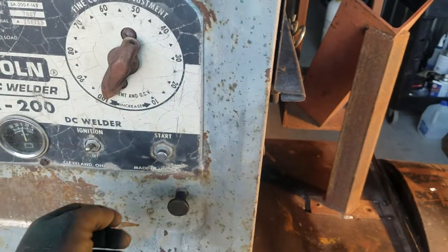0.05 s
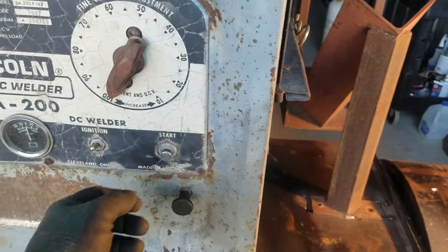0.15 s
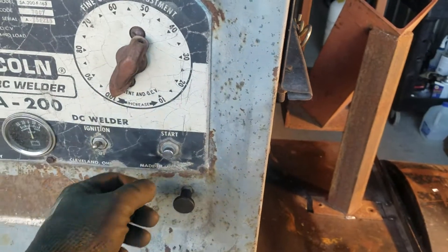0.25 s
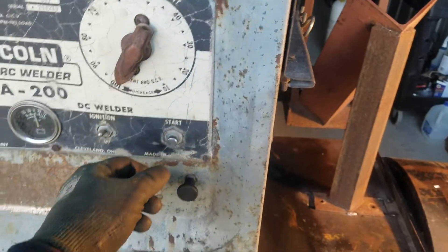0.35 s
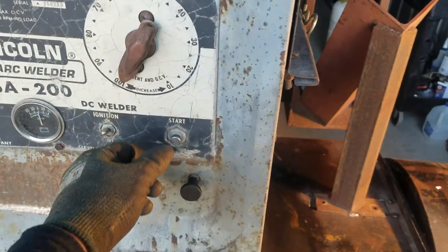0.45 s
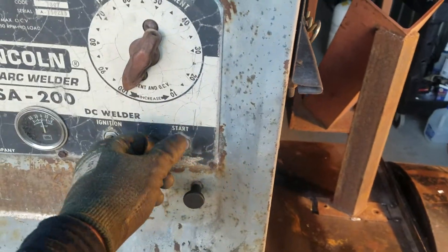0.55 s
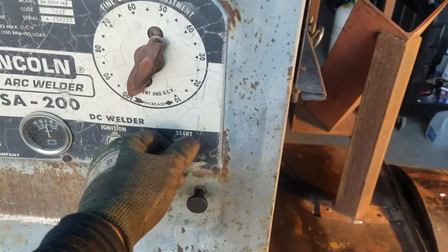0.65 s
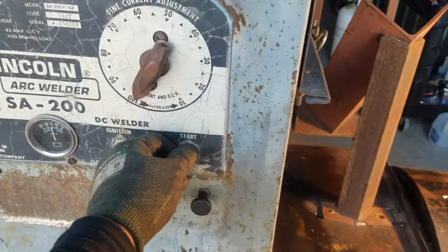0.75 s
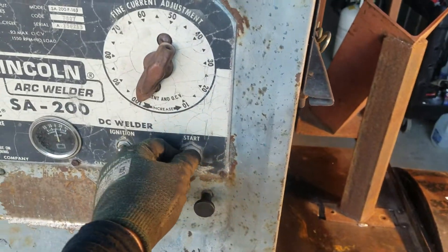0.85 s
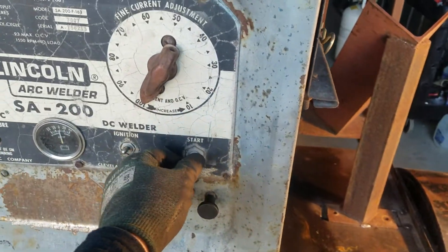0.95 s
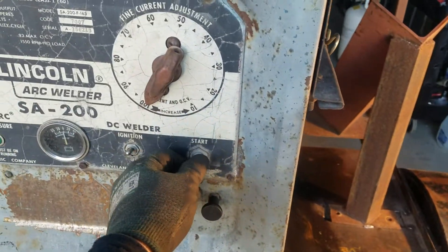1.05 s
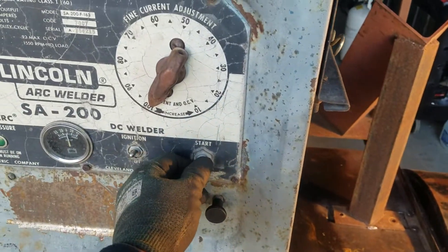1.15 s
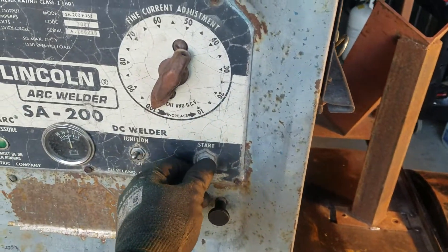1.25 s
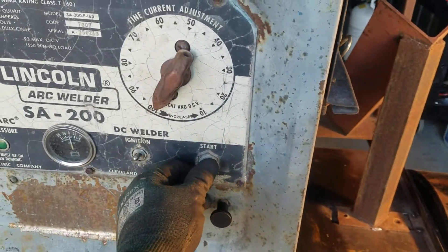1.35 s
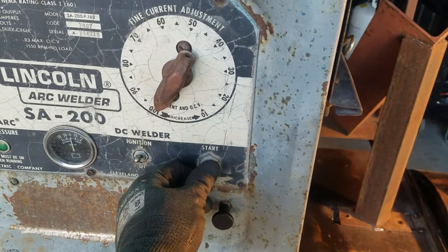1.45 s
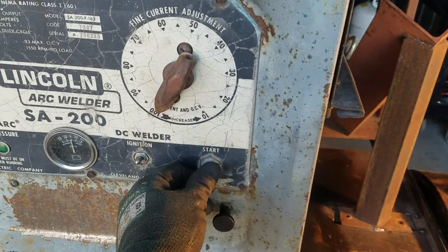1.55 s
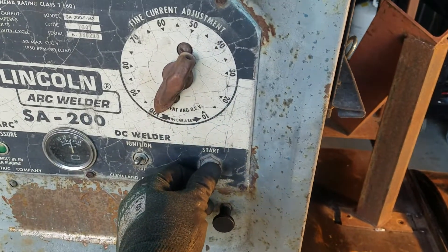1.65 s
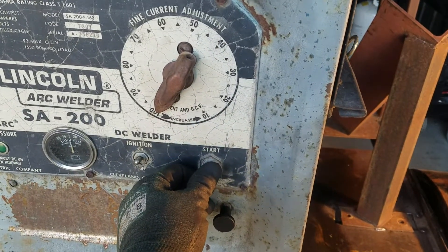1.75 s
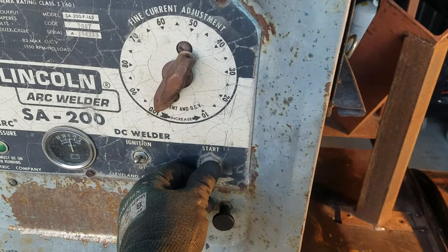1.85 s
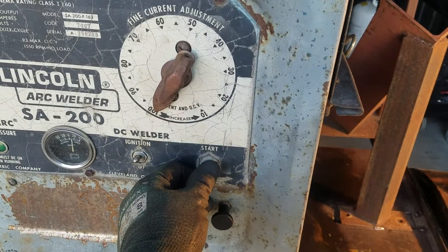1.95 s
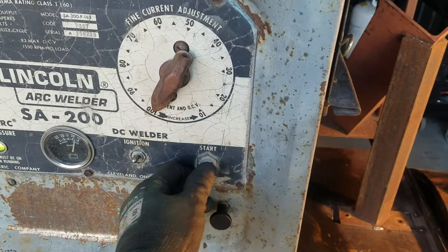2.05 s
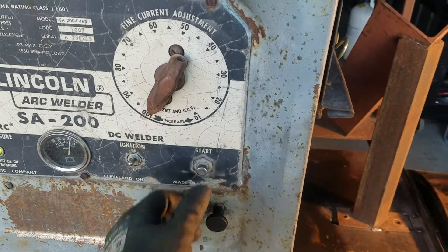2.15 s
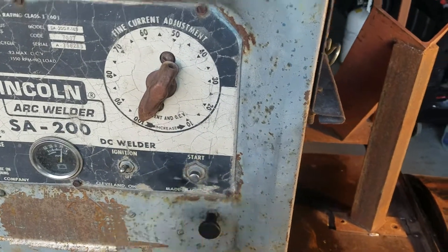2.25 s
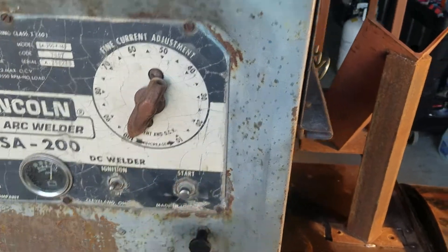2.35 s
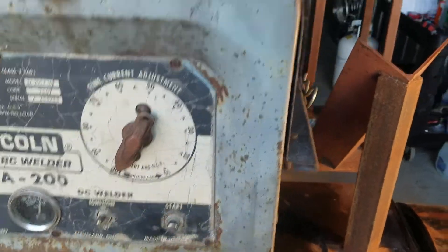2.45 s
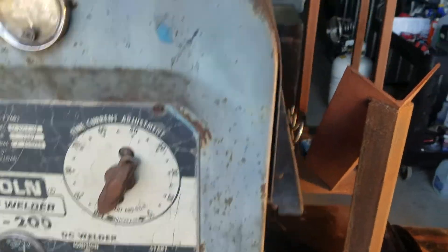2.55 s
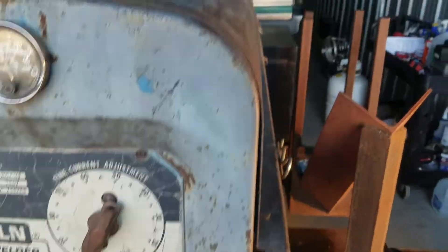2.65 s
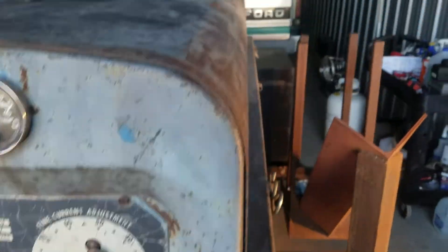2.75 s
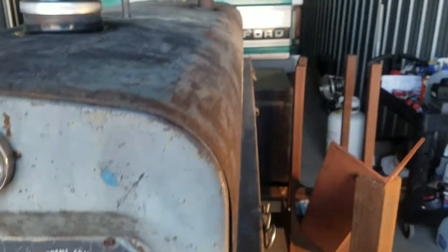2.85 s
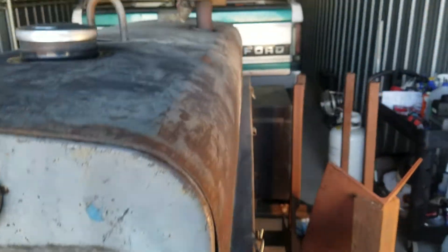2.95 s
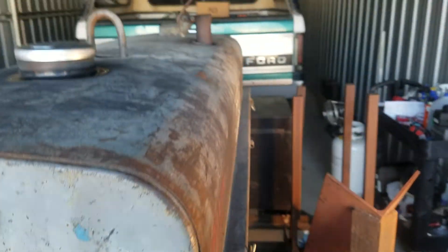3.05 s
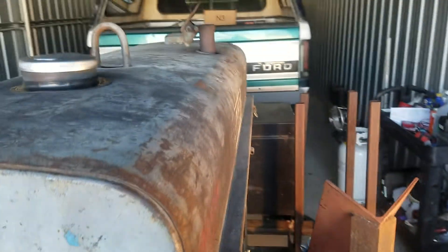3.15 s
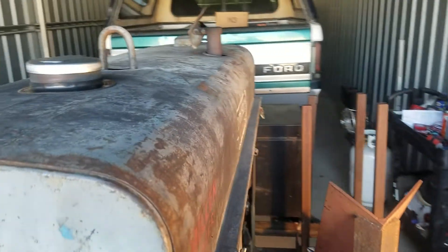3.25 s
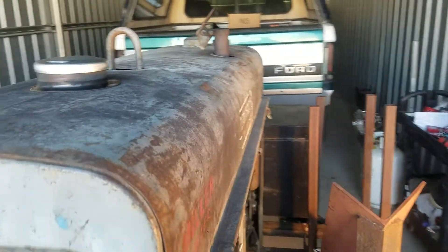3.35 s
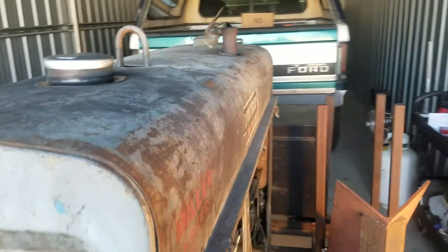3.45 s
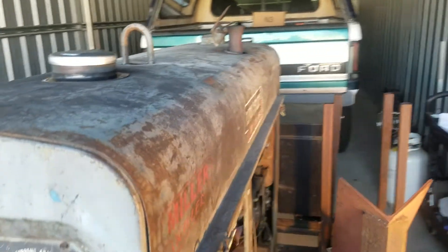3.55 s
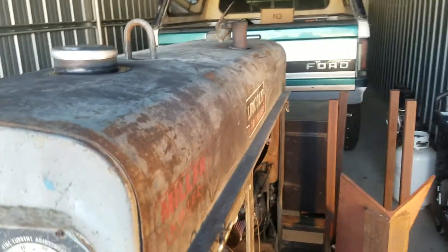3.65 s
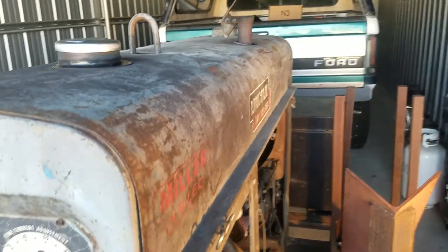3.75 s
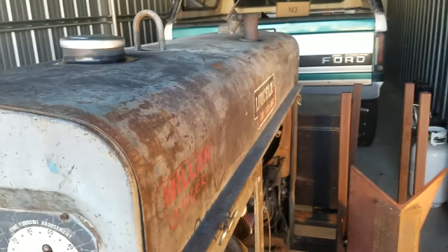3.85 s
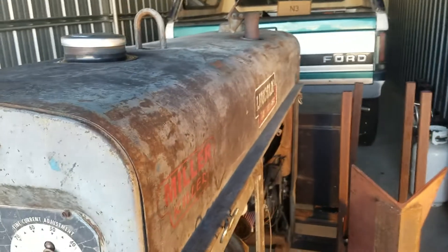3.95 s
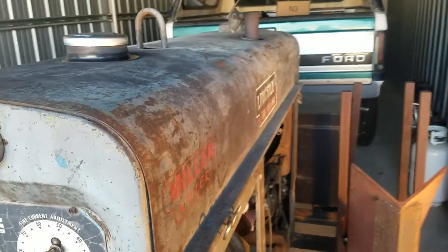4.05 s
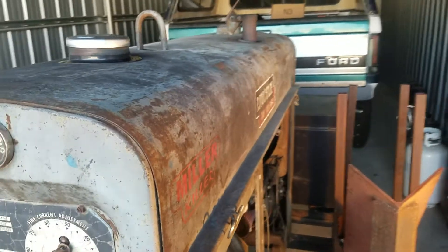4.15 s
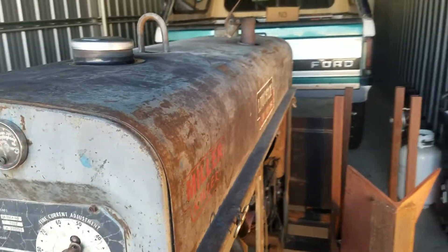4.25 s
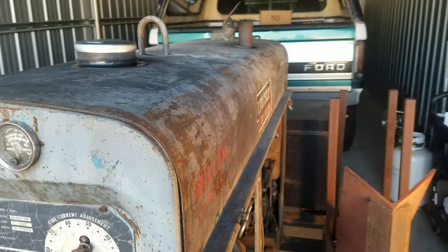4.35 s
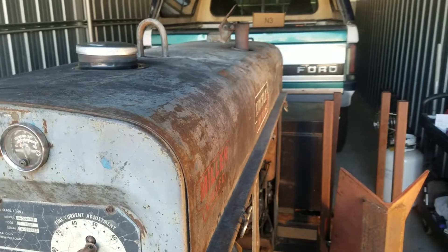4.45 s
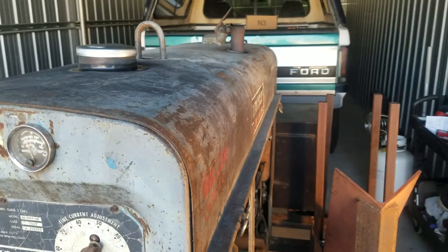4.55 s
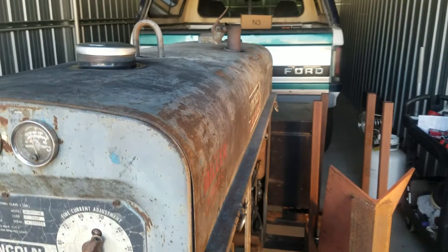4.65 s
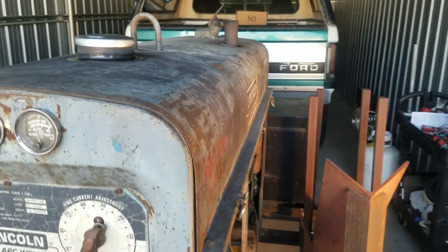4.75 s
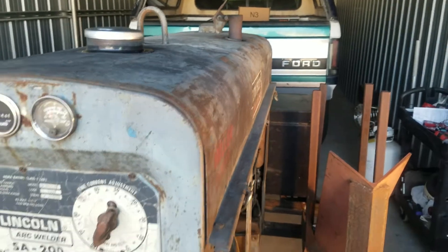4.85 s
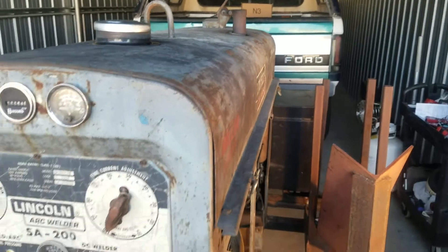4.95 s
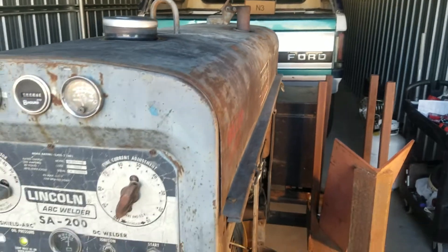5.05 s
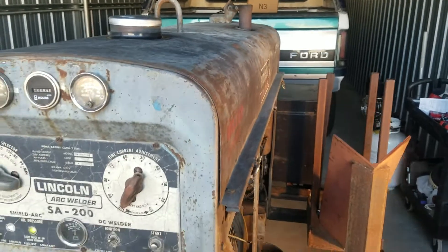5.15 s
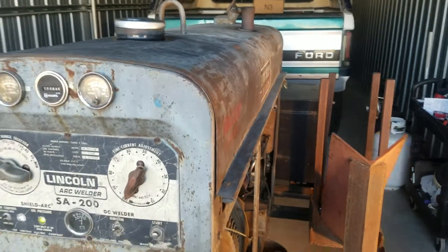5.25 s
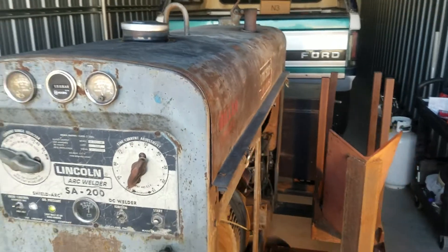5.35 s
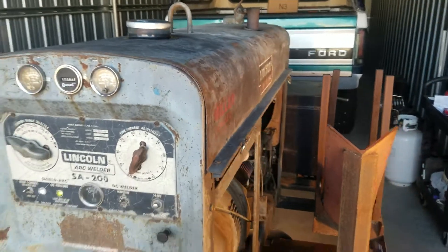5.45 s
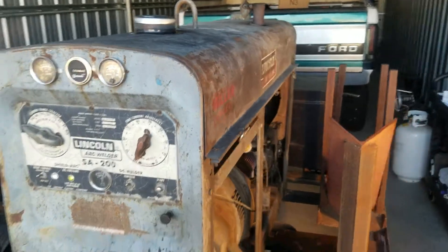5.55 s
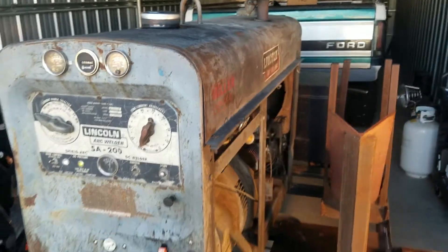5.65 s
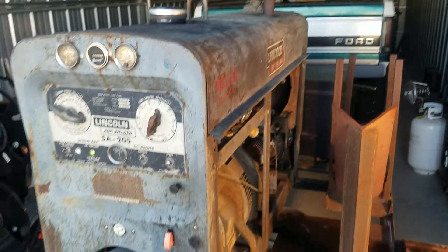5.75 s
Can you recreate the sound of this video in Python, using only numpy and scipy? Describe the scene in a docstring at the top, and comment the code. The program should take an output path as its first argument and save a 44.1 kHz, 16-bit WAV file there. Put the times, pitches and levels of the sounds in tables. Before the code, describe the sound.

In a quiet sheet-metal workshop, a glove and sleeve rustle close to the microphone, with small clicks and a dull thump on a control panel at about 0.8 seconds. A button clicks at 1.3 seconds, and the starter immediately slams in with a ringing clank, grinding and squealing over a low groan through a few surges. The welder's gasoline engine catches just before 2 seconds and the starter drops out shortly after. Hard knocks and exhaust puffs come faster and faster, ringing the steel hood, until about 2.8 seconds. The speed dips slightly and settles into an even drone by 3.3 seconds, while the loose hood taps irregularly. From about 3.5 seconds the rumble, clatter, valve ticking and fan hiss grow as the microphone moves to the engine's open side. It runs steadily, with a light panel buzz, until the end near 5.8 seconds.

```python
"""A four-cylinder gasoline welder starts up close by in a sheet-metal workshop.
A gloved hand rustles and works the switch and start button. The starter's small gear slams into the
engine's ring gear and grinds. The engine catches and races up with hard knocks that ring its hood.
The governor (speed control) closes the throttle, exhaust puffs merge into an even drone, and the
engine's rumble, clatter and fan hiss grow as the microphone moves round to its open side."""
import sys
import numpy as np
from scipy import signal
from scipy.fft import rfft, irfft, next_fast_len
from scipy.io import wavfile

SR = 44100
rng = np.random.default_rng(int(sys.argv[2]) if len(sys.argv) > 2 else 0)


def wrap_up_sound(samples):
    """Save the sound to the file named by the first command line argument, as 16-bit audio."""
    columns = np.atleast_2d(samples).T
    # keep every value between -1 and 1, then stretch to whole-number steps
    tamed = np.clip(columns, -1, 1)
    steps = np.round(tamed * 32767).astype(np.int16)
    wavfile.write(sys.argv[1], SR, steps)


N = 256220
TIME = np.arange(N) / SR
SIZE = next_fast_len(N + SR // 2, real=True) // 2 * 2
FREQ = np.maximum(np.arange(SIZE // 2 + 1) * SR / SIZE, 1)
MESH_S, CATCH_S, RELEASE_S = 1.355, 1.9562, 2.214  # starter engages, engine fires, starter lets go

# tones at which the steel hood rings: f/Hz, width/Hz, boost/dB
HOOD = [(1020, 37, 5), (1604, 18, 3), (1755, 16, 7.5), (1942, 42, 6), (2094, 73, 2.5), (2402, 24, 4),
        (2730, 44, 1), (2797, 54, 3.5), (3090, 16.6, 5), (3340, 40, -1.5)]
# pistons squeeze before the engine fires: t/s, knock/dB, f/Hz, relative snap/dB, gear surge/dB
COMPRESSIONS = [(1.584, -15, 1333, -16, -3.5), (1.688, -14.5, 1524, -15, 0), (1.7945, -14, 1486, -6, -6.5),
                (1.866, -31, 2392, -13, 1.5)]
# the microphone moves from behind the control panel to the engine's open side: t/s, exposure/0-1
EXPOSURE = [(3.4, 0.3), (3.85, 0.52), (4.3, 0.92), (5.0, 1), (5.8, 1)]


def undb(db):
    """Turn decibels into a gain."""
    return np.exp(np.asarray(db) * np.log(10) / 20)


def curves(table):
    """Each column of a table of timed rows, joined by straight lines."""
    times, *columns = np.transpose(table)
    return [np.interp(TIME, times, column) for column in columns]


def slope(points):
    """Gain at every frequency, from points of f/Hz, level/dB."""
    hz, db = np.transpose(points)
    return undb(np.interp(np.log(FREQ), np.log(hz), db))


def noise():
    """Two white noises: mid (what left and right share) and side (how they differ)."""
    return rng.standard_normal((2, N))


def walk(rate):
    """A random wobble of size about 1, with `rate` new values a second."""
    knots = rng.standard_normal(8192)
    return np.interp(TIME * rate, np.arange(len(knots)), knots)


def swell(s, peak_s):
    """A push that starts at time s, reaches 1 after peak_s and dies away."""
    age = np.clip((TIME - s) / peak_s, 0, 20)
    return age * np.exp(1 - age)


def body(x, points, modes=()):
    """Give x a tone colour (f/Hz, relative level/dB) and resonances (f/Hz, width/Hz, boost/dB)."""
    power = slope(points) ** 2
    for hz, width, db in modes:
        power *= 1 + (undb(db) ** 2 - 1) / (1 + ((FREQ - hz) * (2 / width)) ** 2)
    power /= np.mean(power)
    # folding the cepstrum makes the ringing come after a hit, never before it
    cepstrum = irfft(np.log(power + 1e-18).astype(np.float32) / 2)
    cepstrum[1:SIZE // 2] *= 2
    cepstrum[SIZE // 2 + 1:] = 0
    return irfft(rfft(x.astype(np.float32), SIZE) * np.exp(rfft(cepstrum)))[..., :N]


def cabinet(x, echo_db, fade_s):
    """Add the quick echoes that bounce between the steel panels."""
    t = TIME[:2048]
    echoes = rng.standard_normal((2, len(t))) * np.exp(-t / fade_s) * (t > .001)
    echoes *= undb(echo_db) / np.sqrt(np.sum(echoes ** 2, axis=1, keepdims=True))
    return (x + signal.oaconvolve(x, echoes, axes=1)[:, :N]) / np.sqrt(1 + undb(echo_db) ** 2)


def blows(times, db, fade_s, tail_db, tail_s):
    """Loudness of blows over time: each fades fast, then lingers in the metal and the shop."""
    hits = np.full(N, 1e-18)
    np.add.at(hits, np.clip((np.asarray(times) * SR).astype(int), 0, N - 1), undb(db) ** 2)
    direct, tail = (signal.lfilter([1], [1, -np.exp(-2 / (s * SR))], hits) for s in (fade_s, tail_s))
    return np.sqrt(direct + undb(tail_db) ** 2 * tail)


def strike(hits):
    """Struck metal rings: each hit is a time and its tones (f/Hz, level/dB, time to fade 60 dB/s)."""
    out = np.zeros((2, N))
    for s, modes in hits:
        start = int(s * SR)
        t = TIME[:min(int(SR * max(mode[2] for mode in modes)), N - start)]
        attack = np.minimum(t / .001, 1)
        for hz, db, t60 in modes:
            tone = np.sin(2 * np.pi * (hz * t + rng.random((2, 1))))
            out[:, start:start + len(t)] += undb(db - 60 * t / t60) * tone * attack
    return out


def clang(times, hz, width_hz):
    """A blurred panel tone whose pitch jumps with each blow, as each lands on another spot."""
    order = np.argsort(times)
    latest = np.maximum(np.searchsorted(times[order], TIME, side="right") - 1, 0)
    phase = 2 * np.pi * np.cumsum(hz[order][latest]) / SR
    return np.array([np.sqrt(2) * np.sin(phase + 1.1 * walk(width_hz)) for _ in range(2)])


def rubbed_steel(table, wander, rough_db, rate):
    """Short, rough, unsteady tones of steel rubbing on steel."""
    drift, rough = wander * walk(rate), undb(rough_db * walk(rate))
    return rough * sum(undb(db) * swell(s, peak_s) * np.sin(2 * np.pi * (hz * TIME + drift))
                       for s, peak_s, hz, db in table)


def speed():
    """Firings per second: they rise evenly until the governor holds them."""
    # the speed overshoots, swings and settles: t/s, firing rate/Hz
    governed = [(2.75, 55.3), (3.0, 51.8), (3.17, 47.8), (3.33, 51.4), (3.48, 53), (3.78, 50.1),
                (4.0, 51.1), (4.3, 52.2), (4.6, 51.3), (4.85, 50.8), (5.2, 51.7), (5.8, 51.1)]
    first_hz, rise_hz_per_s = 14.74, 52.04
    run_up = first_hz + rise_hz_per_s * (TIME - CATCH_S)
    return np.minimum(run_up, curves(governed)[0]) * (TIME > CATCH_S)


def crank():
    """Count piston strokes since the first firing; those before it count as negative."""
    times = [row[0] for row in COMPRESSIONS] + [CATCH_S]
    return np.interp(TIME, times, np.arange(-len(COMPRESSIONS), 1)) + np.cumsum(speed()) / SR


def each_cycle(firings, count):
    """A random pattern of `count` points that repeats once all four cylinders have fired."""
    patterns = rng.standard_normal((2, count))
    position = firings / 4 * count
    return np.array([np.interp(position, np.arange(count), p, period=count) for p in patterns])


def shake(firings, repeat):
    """Vibration: the share `repeat` comes back every engine cycle, the rest is random."""
    return np.sqrt(repeat * 1.5) * each_cycle(firings, count=3400) + np.sqrt(1 - repeat) * noise()


def crank_tones(firings, orders, waver_db):
    """Wavering tones at multiples of the firing rate."""
    return np.sqrt(2) * sum(
        undb(db + waver_db * walk(9)) * np.cos(2 * np.pi * (order * firings + rng.random()))
        for order, db in orders)


def engine_db(base_db, throttle_db, exposed_db):
    """Level of an engine noise: it follows the throttle and grows on the engine's open side."""
    # the governor shuts the throttle, then eases it open to hold the speed: t/s, opening/0-1
    throttle = [(2.68, 0.68), (2.79, 0.4), (2.95, 0.3), (3.04, 0), (3.22, 0.27), (3.45, 0.05)]
    return base_db + throttle_db * curves(throttle)[0] + exposed_db * curves(EXPOSURE)[0]


def workshop():
    """Quiet, steady room noise with a faint ring in the still air."""
    colour = [(30, -21), (90, -4.5), (160, -6), (270, -13), (400, -11.5), (630, -13.5), (1200, -25),
              (1800, -18.5), (2700, -25), (4000, -32.5), (8000, -36.5), (16000, -32)]  # room noise: f/Hz, level/dB
    ring = [(2720, 50, 11)]  # its ring: f/Hz, width/Hz, boost/dB
    return body(noise() * undb(-65), colour, ring)


def hand():
    """Glove and sleeve rustle, the switch thumps in the panel, and glove and button click."""
    rubs = [(0, 0.017, -52.5), (0.05, 0.044, -60), (0.15, 0.053, -62.5), (0.27, 0.042, -66.5),
            (0.96, 0.04, -77), (1.05, 0.033, -68), (1.15, 0.048, -72), (1.26, 0.064, -63)]  # the hand comes up, then presses: t/s, rise/s, level/dB
    breathy_tones = [(527, 90, 4), (1730, 110, 13), (2640, 220, 5), (3350, 200, 5.5)]  # breathy tones within the rustle: f/Hz, width/Hz, boost/dB
    thump_hits = [(0.511, -43), (0.77, -26), (0.815, -38), (0.845, -41)]  # bumps on the panel: t/s, level/dB
    panel = [(60, -30), (120, -7), (210, 5.5), (280, -1), (390, -0.5), (600, -14), (1050, -18.5),
             (1600, -41), (3000, -51)]  # the panel's dull colour: f/Hz, level/dB
    click_hits = [(0.106, -41), (0.513, -58), (1.18, -58), (1.199, -49), (1.338, -30)]  # small dry clicks: t/s, level/dB
    soft = [(100, -1), (500, -2), (1300, -11), (1900, -10), (3000, -11), (5000, -18.5), (12000, -23)]
    bright = [(500, 3), (3500, -8), (6000, -8), (10500, 0), (16000, -15)]
    crinkle = sum(undb(db) * swell(s, peak_s) for s, peak_s, db in rubs) * undb(1.3 * walk(291))
    cloth = body(crinkle * noise(), soft, breathy_tones)
    thumps = blows(*np.transpose(thump_hits), fade_s=0.015, tail_db=-16, tail_s=0.12) * noise()
    clicks = blows(*np.transpose(click_hits), fade_s=0.0032, tail_db=-5.5, tail_s=0.023) * noise()
    return cloth + undb(-8) * body(thumps, panel) + undb(-10.5) * body(clicks, bright)


def gear_grind(engaged, surges):
    """The starter's teeth grind and squeal on the ring gear, and skid with a rasp in each surge."""
    colour = [(350, -11.5), (600, -35), (812, 0), (1160, -3), (1530, -2.5), (1800, 0), (2340, 1),
              (2550, 2.5), (3390, -1.5), (4050, -2), (5560, -5.5), (7110, -1), (8990, -15), (10900, -2.5),
              (16000, -22)]  # grinding teeth: f/Hz, level/dB
    housing = [(1340, 34, 3), (1513, 48, 7), (2360, 35, 6.5), (2970, 110, 5.5), (3980, 170, 4.5)]  # parts the starter keeps ringing: f/Hz, width/Hz, boost/dB
    squeals = [(1.38, 0.018, 2290, -20.5), (1.39, 0.024, 2150, -25), (1.465, 0.043, 2327, -26.5),
               (1.535, 0.026, 1368, -28), (1.6, 0.015, 2355, -27), (1.692, 0.014, 2710, -28.5),
               (1.798, 0.013, 1500, -23.5), (1.8, 0.0063, 2580, -26), (1.87, 0.012, 2370, -26),
               (1.885, 0.012, 2990, -25.5)]  # ring gear squeals: t/s, rise/s, f/Hz, level/dB
    rasp_colour = [(4000, -46), (7000, -1), (9000, -15), (10900, 1), (12500, -15), (16000, -21)]
    current_rush = undb(3.5) * swell(MESH_S, 0.043)
    overrun = undb(2.5) * swell(CATCH_S, 0.05)  # the firing engine outruns the starter
    force = (1 + current_rush + surges + overrun) * engaged
    teeth = undb(2.4 * walk(700) - 3)
    grind = body(noise() * teeth * undb(-25.5) * force, colour, housing)
    grind = cabinet(grind, echo_db=-1, fade_s=0.0044)
    rasp = body(noise() * teeth * undb(-22) * (surges + 0.64 * overrun), rasp_colour)
    squeal = rubbed_steel(squeals, wander=0.11, rough_db=1.5, rate=130)
    return grind + rasp + squeal * np.array([[1], [-.6]])


def frame_groan(engaged, surges):
    """The starter's uneven twist makes the frame groan and judder until the engine takes over."""
    colour = [(25, -28), (45, -30), (70, -5), (100, 0), (160, -3), (260, -2), (400, 0), (600, -4.5),
              (900, -4), (2000, -53)]  # low groan: f/Hz, level/dB
    frame = [(165, 24, 5), (216, 56, 4), (243, 35, 11.2), (417, 30, 11.1)]  # frame resonances: f/Hz, width/Hz, boost/dB
    judders = [(1.44, 0.015, 418, -21), (1.52, 0.021, 255, -23), (1.525, 0.013, 390, -20.5),
               (1.89, 0.018, 418, -26), (1.96, 0.016, 392, -27)]  # short shudders: t/s, rise/s, f/Hz, level/dB
    current_rush = undb(6) * swell(MESH_S, 0.064)
    easing = undb(-21 * np.maximum(TIME - CATCH_S, 0))
    twist = (1 + current_rush + undb(-8.5) * surges) * easing * engaged
    groan = body(noise() * undb(-29 + 1.1 * walk(44.96)) * twist, colour, frame)
    judder = rubbed_steel(judders, wander=0.06, rough_db=2, rate=50)
    return groan + judder * np.array([[1], [0]])


def starter():
    """The starter's gear slams in and turns the engine, surging after each compression."""
    slam = [(218, -33, 0.42), (254.4, -17.5, 0.52), (322, -20.5, 0.62), (417, -24, 0.34),
            (1370, -27.5, 0.37), (1990, -24, 0.35)]  # frame and housing ring: f/Hz, level/dB, time to fade 60 dB/s
    release = undb(-168 * np.maximum(TIME - RELEASE_S, 0))
    engaged = np.clip((TIME - MESH_S) / 0.0096, 0, 1) * release
    surges = sum(undb(db) * swell(s, 0.026) for s, *_, db in COMPRESSIONS)
    return gear_grind(engaged, surges) + frame_groan(engaged, surges) + strike([(1.376, slam)])


def knocks(table, colour, crash_db, fade_s, tail_db, tail_s,
           snap_db, clang_db, clang_s, ring_db, ring_t60):
    """Blows on engine and hood: a crash, a bright snap, a short clang, and the hood ringing on."""
    times, db, lead_hz, top_db = np.transpose(table)
    crash = noise() * blows(times, db + crash_db, fade_s, tail_db, tail_s)
    crash = cabinet(body(crash, colour, HOOD), echo_db=-7, fade_s=0.016)
    snap = noise() * blows(times, db + top_db + snap_db, fade_s=0.0043, tail_db=-14, tail_s=.01)
    snap = body(snap, [(1500, -2.5), (3000, -11), (8000, -9.5), (11000, 0.5), (16000, -1.5)])
    clangs = clang(times, lead_hz, width_hz=490)
    clangs *= blows(times, db + clang_db, clang_s, tail_db=-18, tail_s=0.02)
    rings = []
    for s, peak_db, hz in zip(times, db + ring_db, lead_hz):
        # the hood's other tones are weaker and vary from knock to knock
        others = [(mode[0], peak_db + rng.normal(-16, 6), ring_t60) for mode in HOOD]
        rings.append((s, [(hz, peak_db, ring_t60)] + others))
    return crash + snap + clangs + strike(rings)


def engine_knocks():
    """Soft compressions, then hard firings; the hood slaps back after the first five firings."""
    fired = [(1.9545, -7, 1565, -15), (2.016, -7, 2042, -14), (2.067, -8, 2117, -12),
             (2.1134, -4.5, 1846, -19), (2.154, -7.5, 2061, -11), (2.196, -7.5, 3130, -26),
             (2.229, -10, 1598, -14), (2.2626, -6.5, 1606, -20), (2.2933, -6, 2783, -14),
             (2.3256, -9, 3439, -11), (2.355, -8.5, 2255, -13), (2.3808, -7, 3134, -18),
             (2.4079, -6, 1597, -10), (2.434, -8.5, 1932, -15), (2.4586, -9, 1896, -9),
             (2.4825, -6.5, 1890, -16), (2.505, -6, 1932, -9), (2.5298, -7.5, 3270, -13),
             (2.5506, -8.5, 2410, -12), (2.574, -6.5, 1457, -12), (2.596, -7, 2080, -12),
             (2.6154, -8, 1843, -16), (2.636, -13, 1735, -20), (2.6544, -6.5, 3140, -19),
             (2.6734, -6.5, 2405, -18), (2.693, -7, 2404, -22), (2.7122, -10.5, 2415, -22),
             (2.7299, -8.5, 2830, -20), (2.7478, -10.5, 2830, -22)]  # knocks as the engine races up: t/s, level/dB, f/Hz, relative snap/dB
    colour = [(150, -16), (300, -6.5), (600, 0.5), (750, -5), (980, -1.5), (1170, -2.5), (1550, -1),
              (2400, 0.5), (3500, 4), (4800, -6.5), (7000, -6.5), (8800, -20), (10800, -12), (16000, -17)]  # their crash: f/Hz, level/dB
    slaps = [(s + 0.013, db - 4.5, hz, snap - 4.5) for s, db, hz, snap in fired[:5]]
    strokes = [row[:-1] for row in COMPRESSIONS] + fired + slaps
    return knocks(strokes, colour, crash_db=-5.5, fade_s=0.0074, tail_db=-16.5, tail_s=0.071,
                  snap_db=4, clang_db=-12.5, clang_s=0.008, ring_db=-13, ring_t60=0.17)


def exhaust(firings):
    """Single puffs ring the pipe at first, then merge into a clean drone as the speed steadies."""
    loudness = [(2.07, -20.5), (2.3, -24), (2.75, -24), (3.15, -25.5), (3.21, -22), (3.65, -19),
                (4.27, -15), (5.3, -16.5), (5.8, -22.5)]  # strength of the exhaust note: t/s, level/dB
    orders = [(1, -30), (2, 0), (3, -18), (4, -7.3)]  # its tones: multiple of the firing rate, level/dB
    pipe = [(30, -48), (70, -18.5), (100, 10), (130, 8.5), (175, 3.5), (260, 0), (420, -12), (800, -35)]
    level_db = curves(loudness)[0]
    merged = np.interp(TIME, [2.7, 3.0, 3.25], [0, .45, 1])
    drone = crank_tones(firings, orders, waver_db=0.63) * undb(level_db) * merged
    lag_strokes = 0.195 - 0.041 * (1 - merged) * walk(30)
    puff_count = np.floor(np.maximum.accumulate(firings - lag_strokes))
    lit_db = np.interp(TIME, [1.7, 2.07], [-13, 0])  # weak until the fuel lights
    strength = undb(level_db + lit_db + 27.5 + 3.5 * walk(60)) * np.sqrt(1 - merged ** 2)
    puffs = body(np.diff(puff_count, prepend=puff_count[0]) * strength, pipe, [(94, 18, 7.1)])
    return drone * np.array([[1], [.06]]) + puffs * np.array([[1], [.15]])


def block_rumble(firings, speed_gain, level_db):
    """The engine block rumbles and growls with the uneven strokes."""
    colour = [(25, -28), (50, -16), (80, -11.5), (125, -2), (180, -0.5), (250, 0.5), (330, -4.5),
              (430, -3.5), (490, -6.5), (600, -4), (760, -10.5), (950, -10), (1150, -20.5), (2000, -50)]  # shaking block: f/Hz, level/dB
    chugs = [(2.071, 1), (2.608, 6), (2.648, 6.5)]  # heavy chugs while speeding up: t/s, level above the rumble/dB
    chugging = 1 + sum(undb(db) * swell(s, 0.0047) for s, db in chugs)
    vibration = shake(firings, repeat=.45) * speed_gain * chugging
    growl_db = 1.26 * (np.cos(4 * np.pi * firings) + walk(100)) - 0.5
    return body(vibration * undb(level_db + growl_db), colour, [(535, 55, 2.3)])


def clatter_and_fan(firings, speed_gain):
    """Valves and pistons clatter at set points of each turn; the fan's hiss pulses along."""
    clatter_colour = [(400, -31), (600, -17.5), (800, -5), (1000, 0.5), (1150, -0.5), (1350, 3), (1750, -3),
                      (2250, 3), (2800, -3.5), (3500, -8), (4500, -12), (7000, -65.5)]  # valves and pistons: f/Hz, level/dB
    hiss_colour = [(2120, -9), (3600, -1), (4080, -10.5), (4950, -4.5), (5750, -6), (7110, -3),
                   (8950, -12.5), (10900, -1.5), (12100, -13.5), (14100, -10), (15100, -24), (16000, -7.5)]  # fan air: f/Hz, level/dB
    surge_db = 0.44 * np.cos(2 * np.pi * firings) + 0.17 * np.cos(4 * np.pi * firings)
    pulse_db = surge_db + each_cycle(firings, count=40)[0] + 1.03 * walk(300)
    clatter_db = engine_db(-31.5, throttle_db=7.5, exposed_db=6.86) + pulse_db
    clatter = body(shake(firings, repeat=0.18) * speed_gain * undb(clatter_db), clatter_colour, HOOD)
    clatter = cabinet(clatter, echo_db=-11.5, fade_s=0.025)
    hiss_db = engine_db(-39.5, throttle_db=18.8, exposed_db=8.96) + 0.51 * pulse_db
    hiss = body(noise() * speed_gain * undb(hiss_db), hiss_colour)
    return clatter + cabinet(hiss, echo_db=-3, fade_s=0.0081)


def hood_taps():
    """The loose hood taps as the engine shakes it."""
    taps = [(2.783, -12.5, 1744), (2.835, -10.5, 2390), (2.872, -9.5, 2390), (2.929, -17, 1840),
            (2.969, -13, 2400), (3.088, -15, 2034), (3.109, -10.5, 1966), (3.215, -9.5, 1960),
            (3.235, -9, 2370), (3.256, -6.5, 2240), (3.294, -6.5, 2125), (3.316, -9, 2335),
            (3.333, -9.5, 2370), (3.353, -9.5, 1304), (3.371, -10.5, 2670), (3.483, -19, 1854),
            (3.537, -13.5, 2390), (4.085, -16, 2150), (4.163, -13, 2097), (4.301, -8, 1930),
            (4.316, -10, 1973), (4.395, -11, 2810), (4.549, -14, 2180), (4.731, -11, 2070),
            (4.785, -12, 2220), (4.929, -9, 2870), (5.005, -12, 2833), (5.078, -12.5, 1900),
            (5.484, -10, 1410), (5.744, -9.5, 2262)]  # hood taps: t/s, level/dB, f/Hz
    colour = [(300, -11), (600, -40), (1100, -13), (1700, 1.5), (2300, 6.5), (3100, -4.5), (5000, -15),
              (7000, -9), (9000, -24), (11000, -9), (16000, -13)]  # their crash: f/Hz, level/dB
    dull_taps = [(*tap, -20) for tap in taps]  # all get the same weak snap
    return knocks(dull_taps, colour, crash_db=-10, fade_s=0.0046, tail_db=-11, tail_s=0.015,
                  snap_db=-6, clang_db=-10.5, clang_s=0.0067, ring_db=-11, ring_t60=0.09)


def valve_ticks(firings, count):
    """The valves tick on each of the last `count` firings, louder on the engine's open side."""
    colour = [(600, -20.5), (1500, 7), (2300, -7.5), (2950, 1), (3600, -4.5), (4500, -19), (8000, -12.5),
              (16000, -19)]  # one tick: f/Hz, level/dB
    strokes = np.floor(firings[-1]) - np.arange(count) + rng.normal(0, 0.1, count)
    times = np.interp(strokes, firings, TIME)
    hidden = 1 - np.interp(times, TIME, curves(EXPOSURE)[0])
    db = -24 + 4.5 * np.clip(rng.standard_normal(count), -2, 1.5) - 8.5 * hidden
    rings = clang(times, hz=rng.uniform(1347, 2926, count), width_hz=300)
    rings *= blows(times, db - 4, fade_s=0.0076, tail_db=-16, tail_s=0.02)
    ticks = noise() * blows(times, db, fade_s=0.0019, tail_db=-15, tail_s=0.012)
    return rings + body(ticks, colour)


def hood_buzz(firings, level_db):
    """The hood panels buzz in step with the engine, fading in after it has settled."""
    orders = [(4.75, -15.5), (5.25, -12.5), (7, -17), (7.95, -12)]  # buzzing tones: multiple of the firing rate, level/dB
    fade_in = np.interp(TIME, [3.8, 5.2], [0, 1])
    return crank_tones(firings, orders, waver_db=3.5) * undb(level_db) * fade_in * np.array([[1], [-.3]])


def scene():
    """Mix all sources into left and right; the shop's walls spread the treble wide."""
    width = [(60, -37), (125, -13), (250, -15), (500, -8.5), (1000, -0.5), (2200, -3), (4000, 0.5)]  # stereo spread: f/Hz, side gain/dB
    firings = crank()
    speed_gain = (speed() / 50.6) ** 0.9  # a faster engine is louder
    rumble_db = engine_db(-26, throttle_db=-4, exposed_db=7.9)
    engine = exhaust(firings) + block_rumble(firings, speed_gain, rumble_db)
    engine += hood_buzz(firings, rumble_db) + clatter_and_fan(firings, speed_gain)
    engine += valve_ticks(firings, count=150) + engine_knocks()
    mid, side = engine + workshop() + hand() + starter() + hood_taps()
    side = irfft(rfft(side, SIZE) * slope(width))[:N]
    return np.array([mid + side, mid - side])


def record(dry):
    """Each microphone opening has its own colour; peaks are rounded and the top treble is cut."""
    balance = [(90, 0.5), (300, -3), (700, -3), (1600, -6), (2300, -10), (7000, -10.5), (8000, -2),
               (9200, 15), (10500, 12.5), (12500, 8.5), (14300, -11), (16000, -2)]  # the two openings: f/Hz, left minus right/dB
    ratio = slope(balance)
    gains = np.array([ratio, np.ones_like(ratio)]) / np.sqrt((1 + ratio ** 2) / 2)
    heard = irfft(rfft(dry, SIZE) * gains)[:, :N]
    rounded = heard / (1 + (heard / .9) ** 6) ** (1 / 6)
    return signal.sosfilt(signal.ellip(10, .2, 80, 15900, fs=SR, output="sos"), rounded)


dry = scene()
out = record(dry)
wrap_up_sound(out)
```